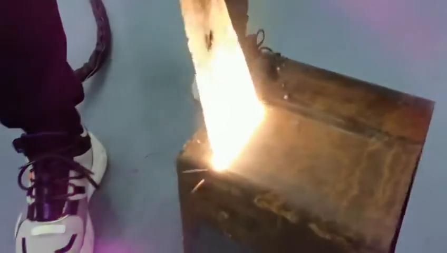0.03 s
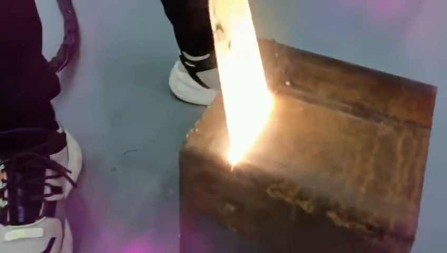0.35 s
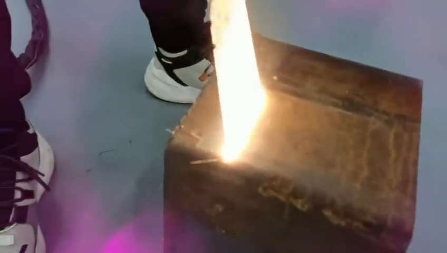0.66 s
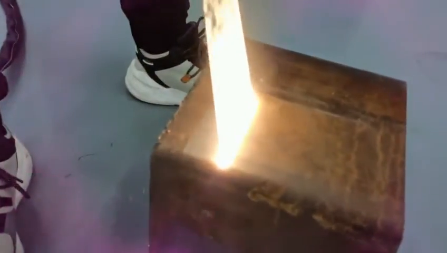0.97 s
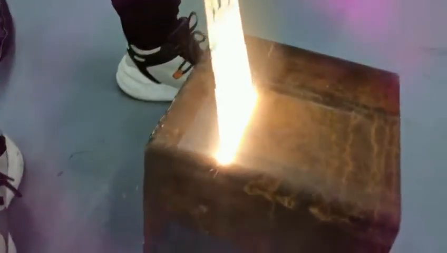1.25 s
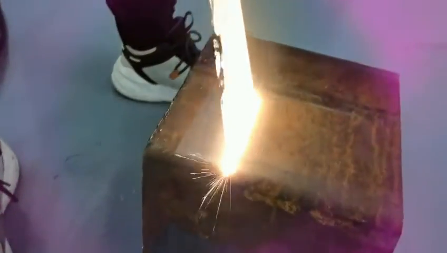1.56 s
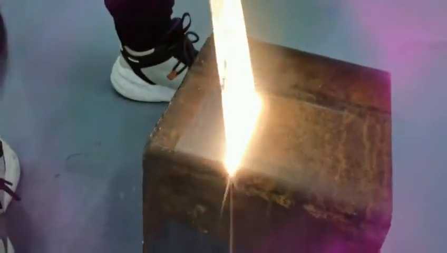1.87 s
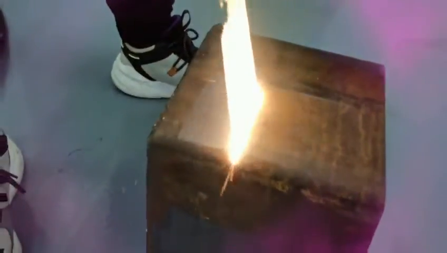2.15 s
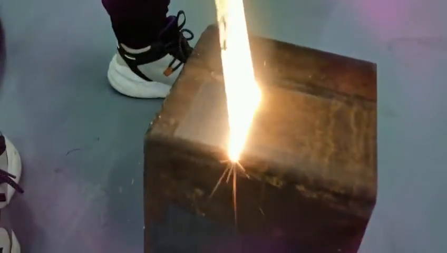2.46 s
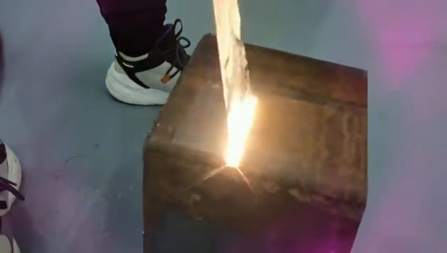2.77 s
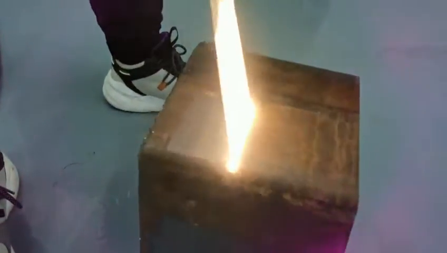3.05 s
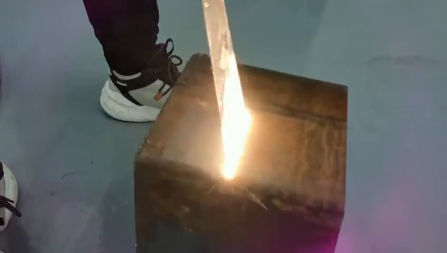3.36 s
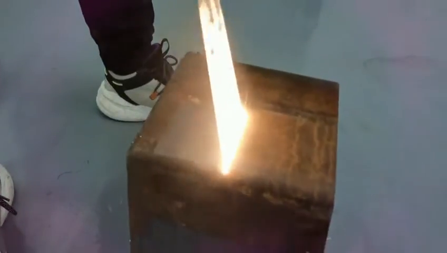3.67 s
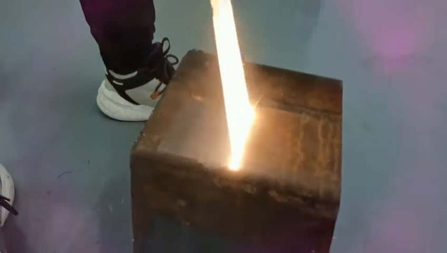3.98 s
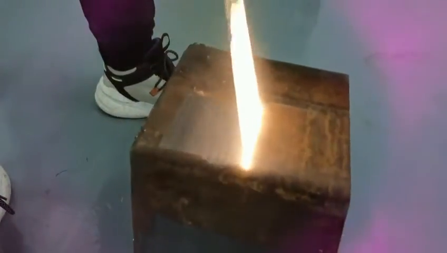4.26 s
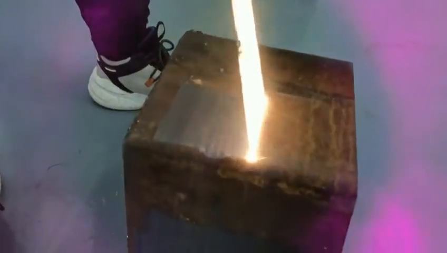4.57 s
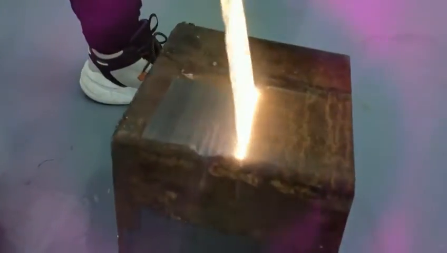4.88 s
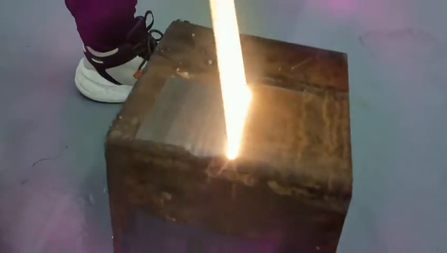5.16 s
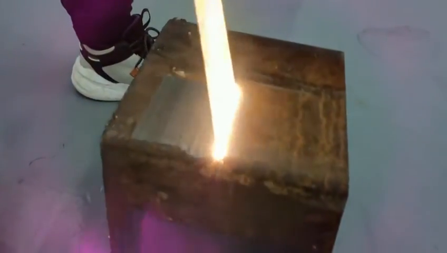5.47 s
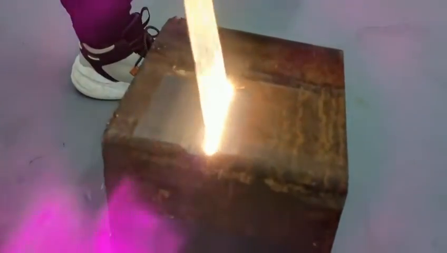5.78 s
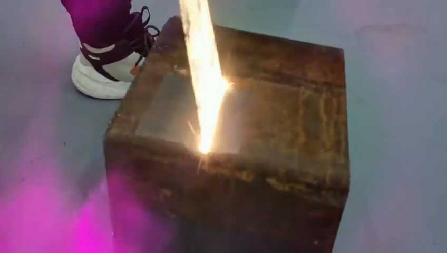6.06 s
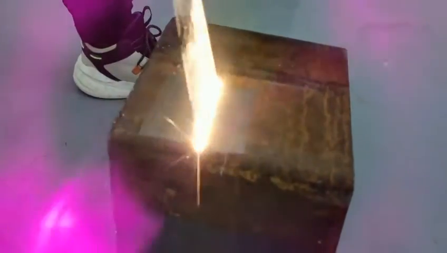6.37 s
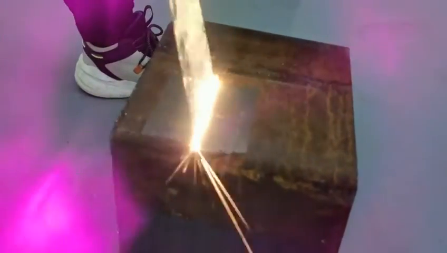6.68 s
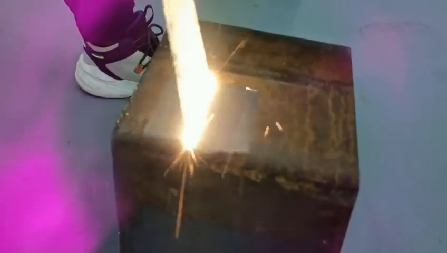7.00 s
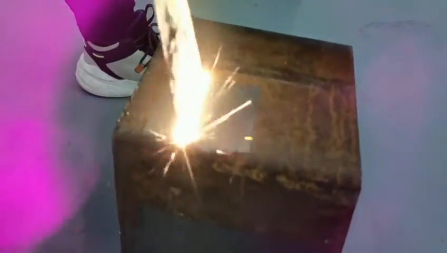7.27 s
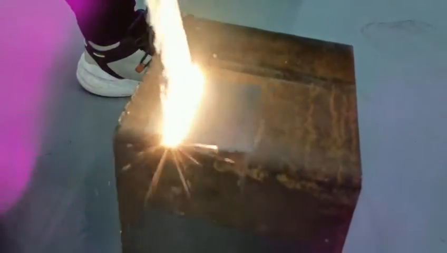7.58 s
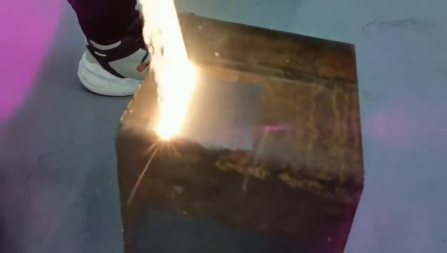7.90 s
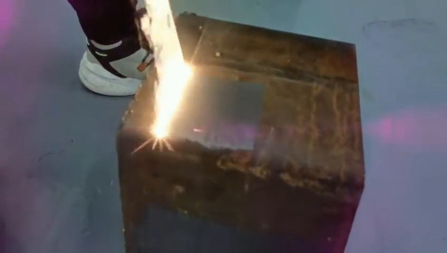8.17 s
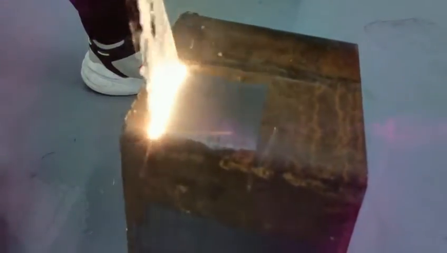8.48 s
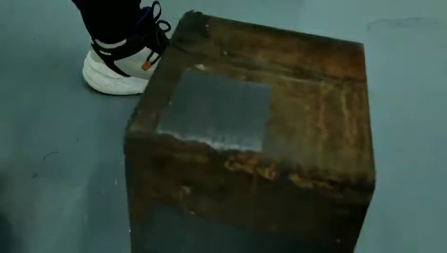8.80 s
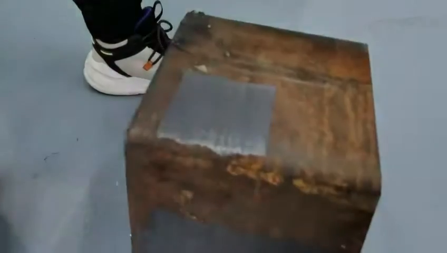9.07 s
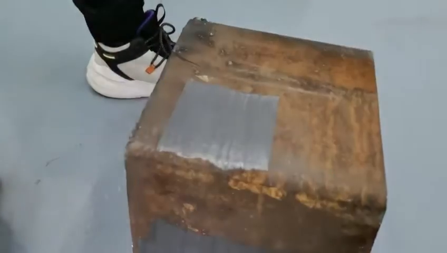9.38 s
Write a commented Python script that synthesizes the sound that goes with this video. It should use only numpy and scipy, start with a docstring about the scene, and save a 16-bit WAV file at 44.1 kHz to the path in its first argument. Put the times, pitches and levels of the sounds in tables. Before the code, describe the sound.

A hand-held laser strips rust from a steel tube with a harsh crackling buzz, then cuts off to quiet workshop hum.

```python
"""Laser rust cleaning in a workshop

Close to a rusty steel tube, on a phone's two microphones. A hand-held laser whips its beam to and fro
98 times a second. Each sweep blasts off nearly the same rust as the last, so the crackle repeats as a
rasping buzz; the beam dwells at its turning points, where vapour knocks and puffs. The trigger is let
go, the room rings out, and the chiller hums on in the background."""
import sys
import numpy as np
from scipy import signal
from scipy.fft import rfft, irfft, next_fast_len
from scipy.io import wavfile
from scipy.ndimage import uniform_filter1d, map_coordinates

SR = 44100
rng = np.random.default_rng(int(sys.argv[2]) if len(sys.argv) > 2 else 0)


def generate_wav(sig):
    """Save sig (samples, or channels by samples) to the path in sys.argv[1] as 16-bit PCM at SR."""
    pcm = np.round(np.clip(np.atleast_2d(sig).T, -1, 1) * 32767).astype(np.int16)
    wavfile.write(sys.argv[1], SR, pcm)


N = 420713
TIME = np.arange(N) / SR
SWEEP_HZ, TRIGGER_OFF_S = 98.317, 8.688


def amp(db):
    return 10 ** (np.asarray(db) / 20)


def unit_rms(x):
    return x / np.sqrt(np.mean(x ** 2) + 1e-20)


def over_pitch(points, hz):
    """Join (pitch_hz, value) points on a log frequency axis."""
    pitches, values = np.transpose(points)
    return np.interp(np.log(hz + 1), np.log(pitches + 1), values)


def over_time(points, times=TIME):
    """Join (time_s, value) points with straight lines."""
    return np.interp(times, *np.transpose(points))


def gate(start_s, length_s, attack_s, release_s):
    """One event's envelope: a straight rise, a hold, a dying away."""
    rise = np.clip((TIME - start_s) / attack_s, 0, 1)
    return rise * np.exp(-np.clip((TIME - start_s - length_s) / release_s, 0, 20))


def swells(events, attack_s, release_s):
    """A gain curve in dB from (start_s, length_s, gain_db) events."""
    return sum(db * gate(start, length, attack_s, release_s) for start, length, db in events)


def wobble(rate_hz):
    """A smooth random curve with rate_hz knots a second."""
    knots = rng.standard_normal(int(N * rate_hz / SR) + 4)
    return map_coordinates(knots, [TIME * rate_hz], order=2)


def filtered(x, response):
    """Apply a complex response, given as a function of frequency."""
    size = next_fast_len(N + SR // 4, True)
    return irfft(rfft(x, size) * response(np.fft.rfftfreq(size, 1 / SR)), size)[..., :N]


def band(x, low_hz, high_hz):
    """A steep band-pass."""
    return filtered(x, lambda hz: ((1 + (low_hz / (hz + 1)) ** 20) * (1 + (hz / high_hz) ** 20)) ** -.5)


def impulse_response(colour, size=8192):
    """A minimum-phase pulse of a (pitch_hz, level_db) colour: it rings only after its cause."""
    cepstrum = irfft(np.log(amp(over_pitch(colour, np.fft.rfftfreq(size, 1 / SR)))))
    cepstrum[1:size // 2] *= 2
    cepstrum[size // 2 + 1:] = 0
    return irfft(np.exp(rfft(cepstrum)))


def struck(blows, pulse):
    """Sound the pulse at every blow, peaking at that blow's strength."""
    return signal.oaconvolve(blows, pulse / np.abs(pulse).max())[:N]


def stereo_noise(colour, width):
    """Noise of rms 1 with a (pitch_hz, level_db) colour; width is side against mid."""
    mid, side = filtered(rng.standard_normal((2, N)), lambda hz: amp(over_pitch(colour, hz)))
    return unit_rms(np.array([mid + width * side, mid - width * side]))


def while_firing(pair, level_db):
    """Hold a stereo layer at level_db until the trigger is let go."""
    power = np.abs(uniform_filter1d((pair ** 2).mean(0), size=5400))
    trigger = np.clip((TRIGGER_OFF_S - TIME) / 0.0022, 0, 1)
    return pair * amp(level_db) / np.sqrt(power + 1e-12) * trigger


def mirror_cycles(slip_s=2.0, slip_cycles=.3):
    """Sweeps done, whole at the near turning point; the rhythm slips once."""
    return SWEEP_HZ * TIME - .31 - slip_cycles * (TIME < slip_s)


def chiller():
    """In the background, the compressor's unsteady tones beat in its droning cabinet, under a soft fan."""
    # compressor tones: pitch_hz, level_db
    tones = [(113, -56), (188.4, -54), (226.1, -51.5)]
    # colours of the cabinet's drone and the fan's rush: pitch_hz, level_db
    cabinet_colour = [(25, -35), (70, -24.5), (105, -16.5), (140, -6.5), (175, -2.5), (212, -4.5),
                      (255, -6.5), (330, -12), (500, -25.5), (1000, -58)]
    fan_colour = [(200, -7.5), (500, -7.5), (1050, -7), (1600, -13.5), (2100, -9.5), (4300, -19),
                  (5000, -28.5), (8600, -27.5), (10500, -53.5), (15000, -75)]
    # the hum dips briefly while the laser fires, and swells a little after it stops: start_s, length_s, gain_db
    drone_swells = [(1.6, 0.26, -7.5), (2.266, 0.23, -7), (8.506, .27, -7), (9.082, 0.11, 2.5),
                    (9.25, 0.058, -1), (9.448, .1, 3)]
    compressor = np.zeros(N)
    for hz, db in tones:
        peak = np.sqrt(2) * amp(db + 1.5 * wobble(8.4))
        compressor += peak * np.sin(2 * np.pi * hz * TIME + 1.7 * wobble(8.3))
    cabinet = amp(-50 + 2.9 * wobble(22)) * stereo_noise(cabinet_colour, width=.52)
    fan = amp(-59.5) * stereo_noise(fan_colour, width=.93)
    return amp(swells(drone_swells, attack_s=.022, release_s=.021)) * (compressor + cabinet) + fan


def scuff():
    """A soft, dull brush in the quiet, perhaps a shoe on the floor."""
    brush = stereo_noise([(500, -25), (1020, 7), (1600, -30), (4000, -80)], width=.6)
    return amp(-61) * gate(start_s=9.2, length_s=.081, attack_s=.04, release_s=.04) * brush


def workshop_reverb(x):
    """Floor and tube scatter short early reflections; the room's tail dies fastest in the top treble."""
    # the workshop's tail: pitch_hz, t60_s, level_db
    decay = [(150, .5, 0), (1000, .55, 1), (1900, .7, 0), (2600, .6, -3), (3600, .62, -2), (4300, .75, 3),
             (5800, .62, -1), (8500, .62, -1), (12000, .38, 2), (15000, .3, 2)]
    hz, t, spectrum = signal.stft(rng.standard_normal((2, SR)), SR, nperseg=256)
    t60_s, db = (over_pitch(np.array(decay)[:, [0, column]], hz)[:, None] for column in (1, 2))
    tail = signal.istft(spectrum * amp(db - 60 * t / t60_s), SR, nperseg=256)[1][:, :SR]
    early = rng.standard_normal((2, SR)) * amp(-60 * TIME[:SR] / .045)
    response = amp(-13) * tail / np.linalg.norm(tail[0]) + amp(-10) * early / np.linalg.norm(early[0])
    return signal.oaconvolve(x, response, axes=1)[:, :N]


def tube_wall(ring_cycles=.45):
    """With the beam near the edge, each sweep knocks the wall, which rings at a harmonic of the sweep."""
    # the wall sings: start_s, length_s, level_db, harmonic_number
    notes = [(0, 0.11, -41.5, 6), (0.41, 0.82, -43.5, 6), (1.3, 0.41, -49, 6), (1.75, 0.17, -39, 6),
             (1.77, 0.17, -38.5, 8), (2.263, 0.26, -45.5, 6), (2.29, 0.16, -46.5, 7),
             (7.386, 0.16, -46.5, 6), (7.994, 0.057, -41, 8), (8.25, 0.044, -42, 7)]
    cycle = mirror_cycles()
    waver = .5 * wobble(6)
    knocks = unit_rms(np.exp(-(cycle % 1) / ring_cycles) * amp(1.9 * wobble(SWEEP_HZ)))
    singing = np.zeros(N)
    for start, length, db, harmonic in notes:
        envelope = amp(db) * gate(start, length, attack_s=.056, release_s=.038)
        singing += envelope * np.sqrt(2) * np.sin(2 * np.pi * harmonic * cycle + waver)
    return knocks * singing


def vapour_thuds(blows, collapse_s=.0014, lag_s=.00046, low_cut_hz=36):
    """Vapour collapses just after each blow: a dull pulse of suction."""
    age = np.maximum(TIME[:SR // 20] - lag_s, 0) / collapse_s
    return filtered(struck(blows, -age * np.exp(-age)), lambda hz: 1j * hz / (low_cut_hz + 1j * hz))


def flame(idle_db=-45, crack_knee_db=-27):
    """Vapour bursts at each near turn: a thud to the left, led by a crack to the right when strong."""
    # the flame flares up: start_s, length_s, strength_db
    flares = [(0.017, 0.14, -36.5), (1.136, 0.37, -39), (1.397, 0.32, -41.5), (1.948, 0.3, -37.5),
              (3.1, 0.31, -39.5), (4.597, 0.23, -38), (4.86, 0.087, -31), (4.961, 0.061, -29),
              (5.04, 0.2, -37), (5.308, 0.069, -33), (5.41, 0.13, -31), (5.671, 0.29, -33.5),
              (5.952, .06, -30.5), (6.04, 0.17, -28.5), (6.25, 0.11, -36), (6.339, 0.19, -27),
              (6.722, 0.065, -29.5), (6.79, 0.28, -27), (7.07, 0.057, -39), (7.137, 0.076, -26.5),
              (7.22, 0.18, -33), (7.505, 0.17, -33), (7.649, 0.22, -30.5), (7.866, 0.2, -34.5),
              (8.086, 0.39, -38.5)]
    # a lump of rust goes up at once: time_s, thud_db, crack_db
    lump_pops = [(1.178, -26, -37), (1.969, -27, -30.5), (2.163, -29, -45), (6.146, -20.5, -30),
                 (6.401, -24.5, -28), (6.411, -35, -17.5), (6.523, -33, -22), (6.534, -32, -19),
                 (6.798, -19.5, -16), (6.807, -28, -15), (6.859, -31, -14.5), (6.869, -34.5, -14),
                 (6.911, -26.5, -21), (7.011, -37, -23), (7.062, -34, -17), (7.103, -43, -21),
                 (7.143, -24, -13), (7.153, -33, -15.5), (7.164, -37, -12), (7.184, -30, -14),
                 (7.194, -30, -25), (7.225, -33, -18.5), (7.235, -32, -21), (7.245, -43, -24),
                 (7.815, -25, -28)]
    # colours of a small crack, a lump's crack and the flame's hot air: pitch_hz, level_db
    crack_colour = [(20, -12.5), (150, 2), (400, 4), (650, -3.5), (1000, -7.5), (1500, -10), (4000, -49)]
    lump_colour = [(20, -8), (100, 2), (380, 1), (700, -1.5), (1500, -1.5), (3000, -12), (8000, -52)]
    draught_colour = [(15, -11), (45, -6), (90, -4), (200, -17), (450, -12), (800, -28), (1500, -56.5)]

    def scatter(spread_db):
        return amp(spread_db * np.clip(rng.standard_normal(N), -2, 2))

    flaring = [amp(db) * gate(start, length, attack_s=.017, release_s=.021)
               for start, length, db in flares]
    flame_db = 20 * np.log10(np.maximum(amp(idle_db), np.max(flaring, axis=0)))
    crack_db = flame_db + 2 + .9 * np.minimum(flame_db - crack_knee_db, 0)  # fades faster below the knee
    jittered_cycle = mirror_cycles() + .018 * wobble(SWEEP_HZ)
    bursts = np.diff(np.floor(jittered_cycle), prepend=-1) * (TIME < TRIGGER_OFF_S)
    thuds = bursts * amp(flame_db) * scatter(2.5)
    cracks = bursts * amp(crack_db) * scatter(3.5)
    lumps = np.zeros(N)
    for time_s, thud_db, lump_db in lump_pops:
        cracks[np.abs(TIME - time_s) < .5 / SWEEP_HZ] = 0  # the lump's crack replaces that of its sweep
        thuds[round(time_s * SR)] += amp(thud_db)
        lumps[round(time_s * SR)] = amp(lump_db)
    crackle = struck(cracks, impulse_response(crack_colour)) + struck(lumps, impulse_response(lump_colour))
    draught = while_firing(stereo_noise(draught_colour, width=.69), flame_db)
    return (vapour_thuds(thuds) * amp([[6], [-6]])  # dB at the left and right microphones
            + crackle * amp([[-7.5], [7.5]])
            + draught * amp([[-14], [-21]]))


def shimmer(shape, knots=(56, 70)):
    """Reflections off the tube shift as the spot moves: a smooth random field over pitch and time."""
    across_pitch = signal.resample(rng.standard_normal(knots), shape[0], axis=0)
    return unit_rms(signal.resample(across_pitch, shape[1], axis=1))


def spot_to_microphones(x, slide_share=.04, sway_rad=.25, shimmer_rad=.4, shimmer_db=1.3):
    """The gun's stance and the tube colour the sound; flying spot and swaying hand shift its arrival."""
    # paths from spot to microphones for four stances of the gun: pitch_hz, left_db, right_db
    opening = [(600, -13.5, -15.5), (1550, -12, -14.5), (1910, -16, -12), (2570, -11, 0.5),
               (3350, -8, -2.5), (4130, -11, -4.5), (5630, -15, -18.5), (6800, -3.5, -13.5),
               (7900, -0.5, -12.5), (8500, -6.5, -8.5), (9400, -7, -0.5), (10360, -15, -9.5),
               (13000, -11.5, -12), (15500, -7, -15.0)]
    at_edge = [(600, -18, -21.5), (1300, -9.5, -9.5), (1550, -15, -13), (1940, -14, -5), (2650, -17, 1),
               (3500, -9, -1), (4270, -19, -3.5), (5500, -17.5, -16.5), (6800, -21, -12), (8360, -24.5, -8),
               (9650, -26, -2), (10800, -27.0, -9), (13300, -18.5, -17), (15500, -14.5, -13.5)]
    outward = [(600, -22, -27.5), (1320, -11, -12.5), (1560, -17.5, -19.5), (1893, -12.0, -10),
               (2780, -11.5, -4), (4180, -10.0, -8), (5200, -10, -16.5), (6250, -8.5, -21.0),
               (7200, -9, -18), (8200, 0.5, -12.5), (8650, 0.5, -14), (9600, -10.5, -6), (10300, -13, -9.5),
               (13140, -15.0, -21.5), (15700, -13.5, -15)]
    returning = [(600, -18, -21.5), (1550, -11, -15), (1900, -11, -8.0), (2170, -12.5, -10.5),
                 (2474, -10, -0.5), (3200, -11, -5), (4100, -8.5, -5.5), (5450, -9.5, -12),
                 (6940, -8.0, -20), (8170, 0, -13.5), (8970, 1, -8), (9600, -7.5, -7), (10400, -15, -10),
                 (11300, -11.5, -12.5), (12700, -13, -20.5), (15500, -13, -14.5)]
    # the gun glides between those stances: time_s, stance_index
    moves = [(.3, 0), (.55, 1), (1.15, 1), (1.21, 2), (4.3, 2), (4.9, 3)]
    # resonances of the steel tube, and one hollow: pitch_hz, width_hz, gain_db
    resonances = [(776, 18, 2), (1835, 106, 3.5), (2174, 69, -3), (2490, 290, 2), (3830, 260, 4.5)]
    # phase by which the left microphone leads: pitch_hz, lead_rad
    left_lead = [(500, 0.41), (1900, 0.57), (2700, 1.66), (3400, 2.6), (4100, 3.95), (5300, 6.27),
                 (7500, 4.25), (9300, 5.3), (10500, 9.98), (15000, 14.4)]
    shift = .55 * np.cos(2 * np.pi * mirror_cycles()) * np.gradient(x)  # adding slope shifts the timing
    hz, t, spectrum = signal.stft(np.array([x + shift, x - shift]), SR, nperseg=512)
    grid = spectrum.shape[1:]

    def drift(knots):
        return unit_rms(signal.resample(rng.standard_normal(knots), len(t)))

    stances = [np.array(stance) for stance in (opening, at_edge, outward, returning)]
    shares = np.maximum(0, 1 - np.abs(over_time(moves, t) - np.arange(len(stances))[:, None]))
    colours = [[over_pitch(stance[:, [0, mic]], hz) for stance in stances] for mic in (1, 2)]
    path_db = np.array([np.transpose(colour) @ shares for colour in colours])
    slide = 1 + slide_share * drift(30)  # resonances slide as the spot travels along the tube
    ring_db = sum(db / (1 + ((hz[:, None] - centre * slide) / width) ** 2)
                  for centre, width, db in resonances)
    lead_rad = over_pitch(left_lead, hz)[:, None] + sway_rad * drift(24) + shimmer_rad * shimmer(grid)
    phases = np.exp(.5j * np.array([lead_rad, -lead_rad]))
    gain = amp(path_db + shimmer_db * shimmer(grid) + ring_db)
    return signal.istft(spectrum * gain * phases, nperseg=512)[1][:, :N]


def rust_surface(memory, lasting, grit_db, points=448):
    """Each sweep meets a share (memory) of the last one's pattern; a part (lasting) never changes."""
    cycle = mirror_cycles() + 1
    shape = (int(cycle[-1]) + 1, points)

    def worn():
        return unit_rms(signal.lfilter([1], [1, -memory], rng.standard_normal(shape), axis=0))

    flakes = unit_rms(worn() * amp(grit_db * worn()))
    steel = unit_rms(irfft(np.exp(2j * np.pi * rng.random(points // 2 + 1))))
    surface = np.sqrt(1 - lasting) * flakes + np.sqrt(lasting) * steel
    return map_coordinates(surface.ravel(), [cycle * points], order=3)


def beam_dwell(far_db, width_cycles, floor, scatter_db):
    """The blast peaks wherever the mirror turns, on a floor that leans towards one end of the sweep."""
    cycle = mirror_cycles()
    near, far = (np.exp(-np.abs((cycle - turn + .5) % 1 - .5) / width_cycles) for turn in (0, .55))
    peaks = (near + amp(far_db) * far) / np.maximum(1, amp(far_db))
    lean = (.17 - .025 * far_db) * np.cos(2 * np.pi * (cycle - .09))
    return (floor * (1 + lean) + peaks) * amp(scatter_db * wobble(SWEEP_HZ))


def rust_blast(uneven_hz=17):
    """Fine rust sizzles, new at almost every sweep; coarse flakes and vapour knocks repeat more exactly."""
    # fine rust bursting, coarser grains frying, flakes tearing off, vapour knocking: time_s, level_db
    sizzle_levels = [(0, -20.0), (0.33, -19.5), (0.42, -21.5), (1.16, -24.0), (1.21, -18), (1.64, -19.5),
                     (1.78, -22.5), (2.1, -18.5), (2.35, -21.0), (2.49, -25), (2.56, -18.5), (2.99, -23.5),
                     (3.19, -19.5), (3.62, -23), (4.44, -23.5), (4.8, -18.0), (6.1, -17.5), (8.33, -21.0),
                     (8.46, -18.0), (8.61, -25.5), (8.67, -22.0)]
    frying_levels = [(0, -22.5), (1.1, -23.5), (1.6, -25.5), (1.8, -27.0), (2.12, -24.5), (2.45, -28.5),
                     (3.2, -28), (4.5, -28), (4.9, -23.5), (6.1, -23.5), (7.05, -23.5), (7.2, -23.5),
                     (8.4, -23), (8.62, -30), (8.67, -28)]
    rasp_levels = [(0, -23.5), (0.9, -24.5), (1.5, -27), (2.3, -27), (2.45, -29.5), (4.45, -30),
                   (4.95, -25.5), (5.75, -26.5), (6.3, -26.0), (6.75, -29.5), (7.05, -28.0), (8.4, -28),
                   (8.66, -34.5)]
    knock_levels = [(0, -34.5), (.89, -32.5), (1.3, -36.5), (1.72, -37.5), (1.77, -32.5), (2.27, -39),
                    (3.33, -38), (4.27, -43.5), (4.39, -34.5), (4.58, -44.5), (4.66, -36.5), (6.5, -35.5),
                    (6.57, -44), (6.83, -38.5), (8.2, -43.5), (8.4, -40), (8.67, -53)]
    # scabs of thick rust (+) and nearly bare spots (-): start_s, length_s, thickness_db
    patches = [(1.425, 0.057, -4), (2.213, 0.029, -4.5), (2.286, 0.084, 1.5), (2.637, 0.056, -7),
               (2.721, 0.061, 5.5), (3.653, 0.041, 4), (4.28, 0.068, 4), (4.497, 0.039, -4),
               (4.833, 0.019, -11.5), (5.64, 0.046, -3.5), (6.214, 0.051, -6.5), (6.696, 0.018, -8),
               (7.28, 0.084, 1.5), (8.382, 0.076, 0.5)]
    # a thick flake burns off and the rasp flares: start_s, length_s, gain_db
    thick_flakes = [(0.237, 0.12, 3.5), (4.59, 0.053, 3), (4.867, 0.061, 4), (5.86, 0.087, 4),
                    (6.056, .07, 3.5), (6.91, 0.031, 6.5), (7.286, 0.056, 3)]
    # the far turning point against the near one: time_s, balance_db
    far_balance = [(0, 4), (1.95, -4.5), (2.2, 2.5), (4.4, 10), (6.15, 3), (6.6, 3), (8, -2.5), (8.7, 8)]
    thickness_db = swells(patches, attack_s=.0085, release_s=.0065)
    flake_db = swells(thick_flakes, attack_s=.017, release_s=.0086)
    far_db = over_time(far_balance)

    def level(points, patch_share, uneven_db):
        return over_time(points) + patch_share * thickness_db + uneven_db * wobble(uneven_hz)

    sizzle = rust_surface(memory=.5, lasting=.01, grit_db=1.8)
    sizzle *= beam_dwell(far_db - 3, width_cycles=.04, floor=1.3, scatter_db=.7)
    frying = rust_surface(memory=.5, lasting=.054, grit_db=1.6)
    frying *= beam_dwell(far_db - 2, width_cycles=.04, floor=.85, scatter_db=1)
    rasp = rust_surface(memory=.68, lasting=.1, grit_db=2.4)
    rasp *= beam_dwell(far_db, width_cycles=.07, floor=.45, scatter_db=1.2)
    knock = rust_surface(memory=.64, lasting=.15, grit_db=3)
    knock *= beam_dwell(far_db, width_cycles=.05, floor=.45, scatter_db=1.3)
    layers = [(band(sizzle, 6830, 17000), level(sizzle_levels, patch_share=.36, uneven_db=.5)),
              (band(frying, 3070, 6700), level(frying_levels, patch_share=.55, uneven_db=.85)),
              (band(rasp, 1643, 2995), level(rasp_levels, patch_share=.59, uneven_db=.73) + flake_db),
              (band(knock, 565, 1430), level(knock_levels, patch_share=.74, uneven_db=1.5))]
    return sum(while_firing(spot_to_microphones(layer), db) for layer, db in layers)


def scene():
    """The laser's blast and the singing tube up front, the workshop and its chiller behind."""
    laser = rust_blast() + flame() + tube_wall()
    return laser + workshop_reverb(laser) + chiller() + scuff()


def record(dry, top_hz=16000):
    """The phone keeps nothing above its band limit."""
    return filtered(dry, lambda hz: np.clip((top_hz - hz) / 200, 0, 1))


dry = scene()
out = record(dry)
generate_wav(out)
```